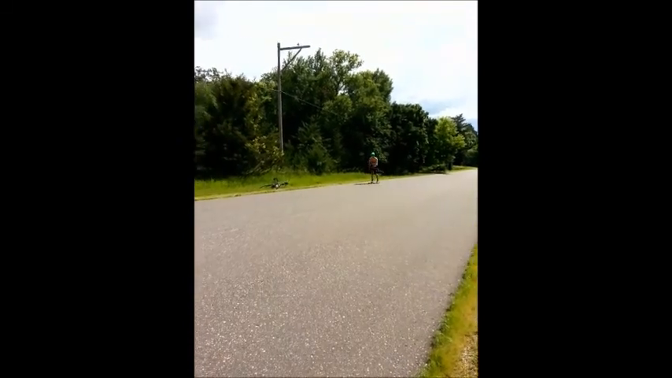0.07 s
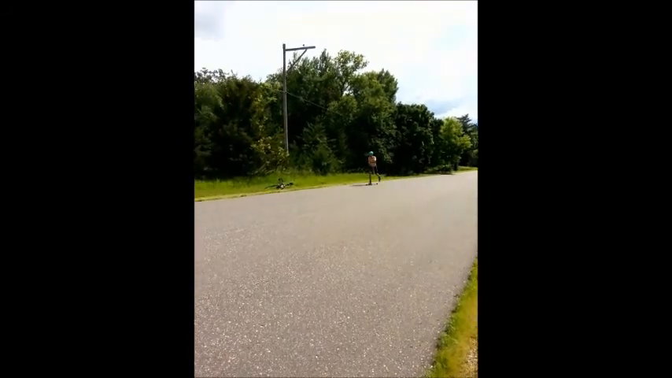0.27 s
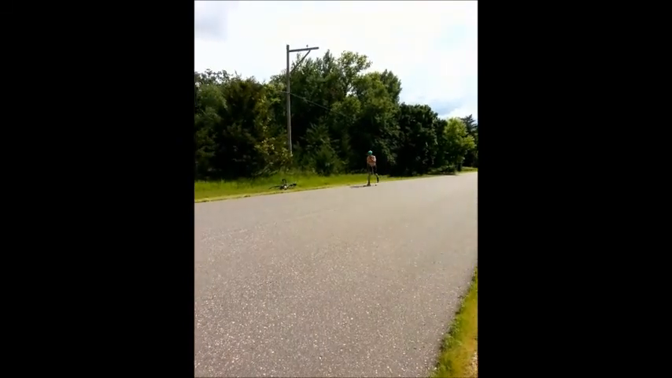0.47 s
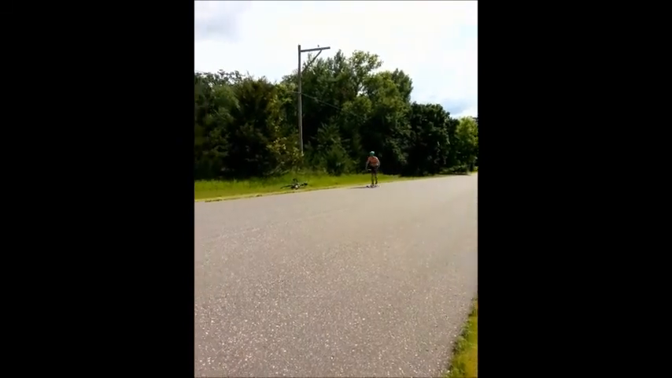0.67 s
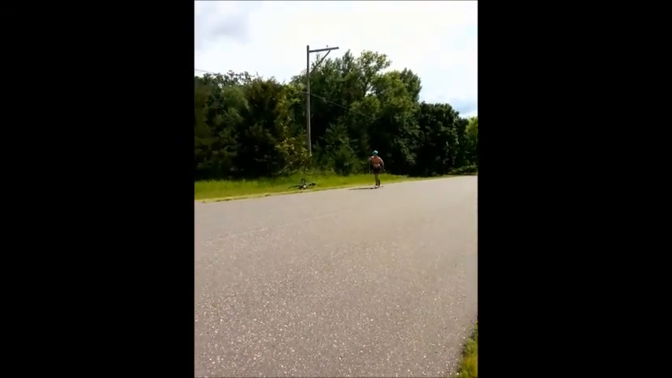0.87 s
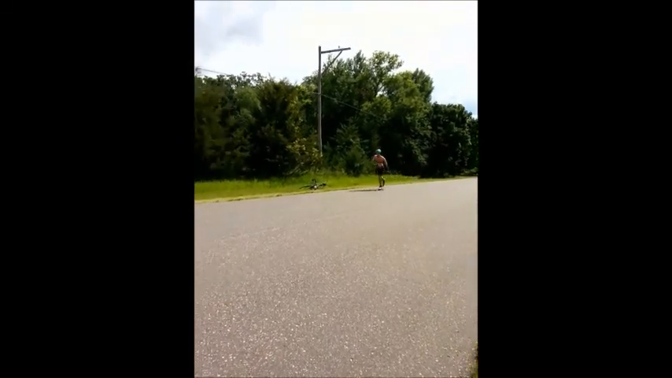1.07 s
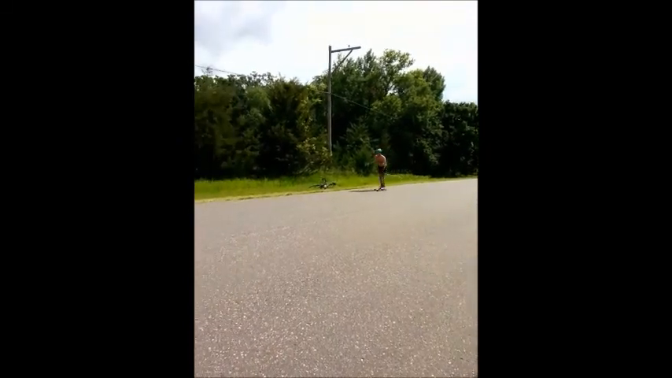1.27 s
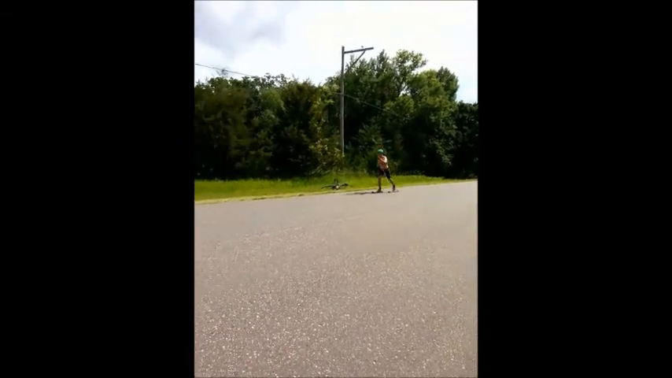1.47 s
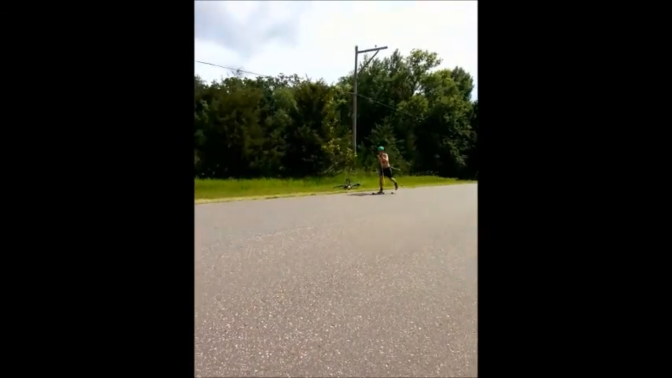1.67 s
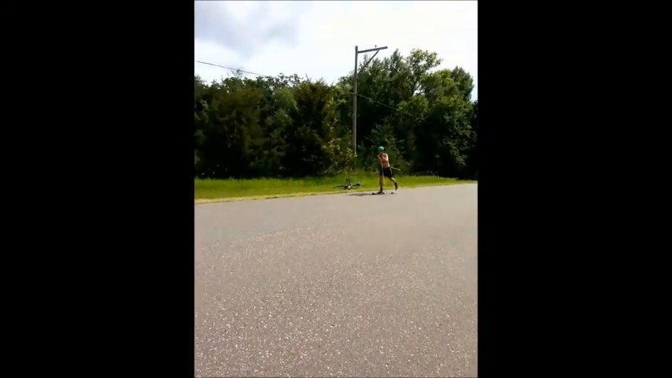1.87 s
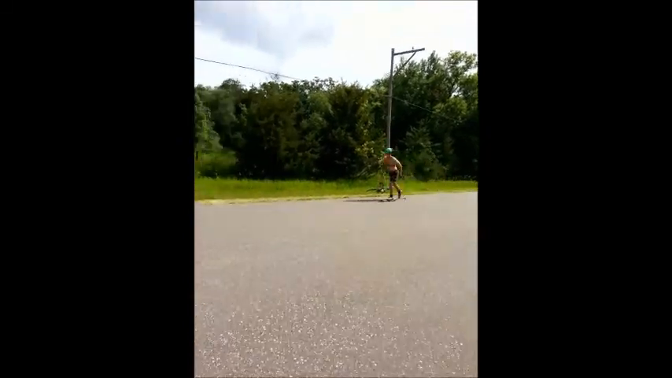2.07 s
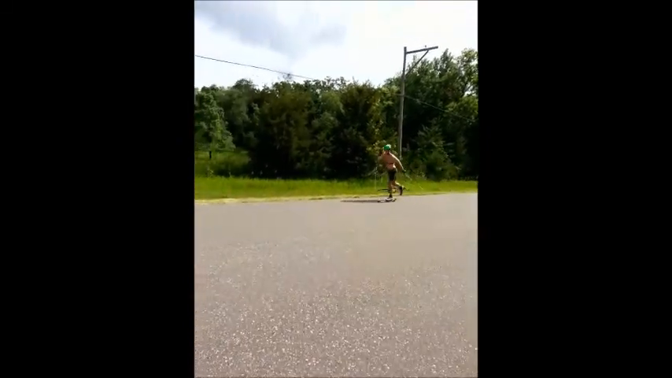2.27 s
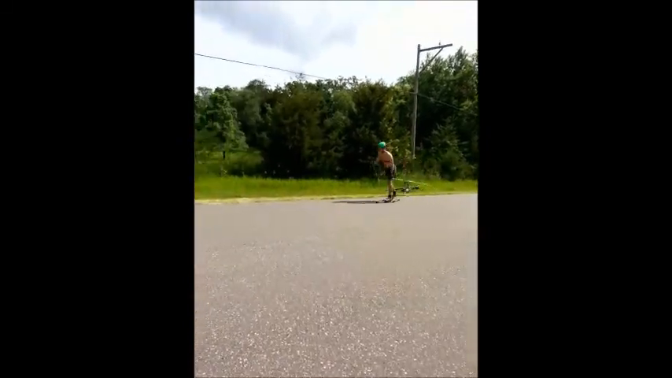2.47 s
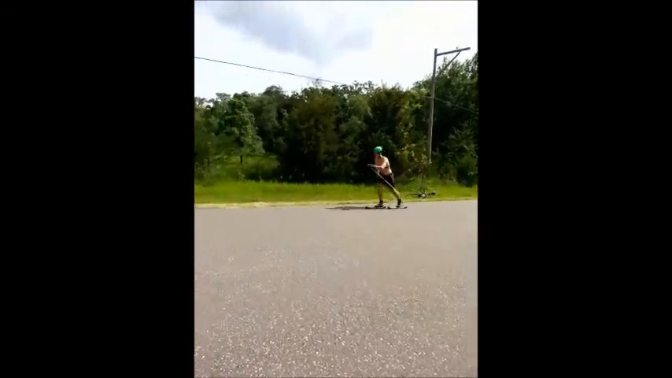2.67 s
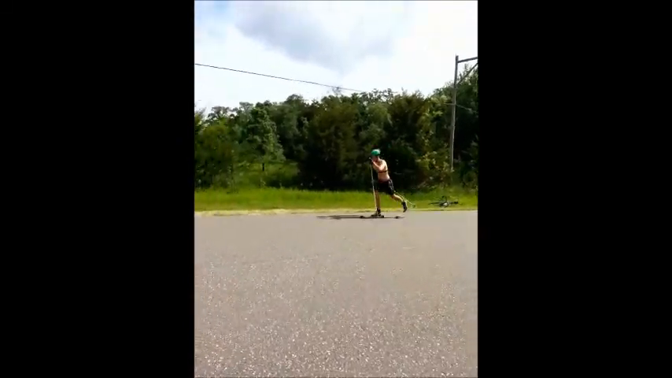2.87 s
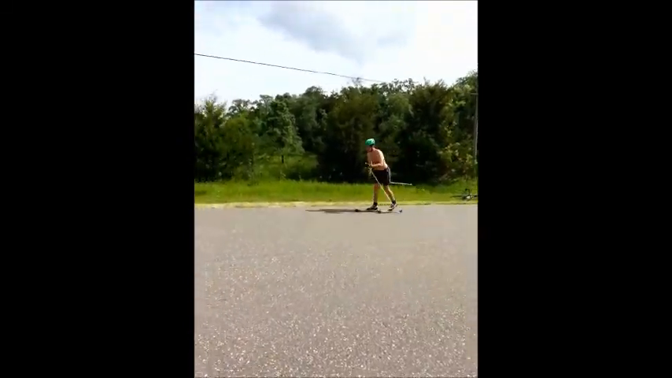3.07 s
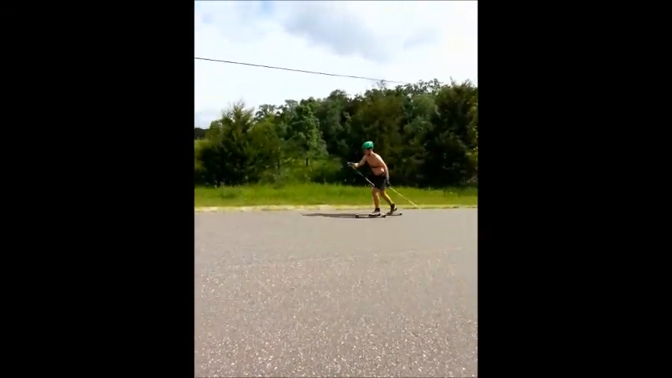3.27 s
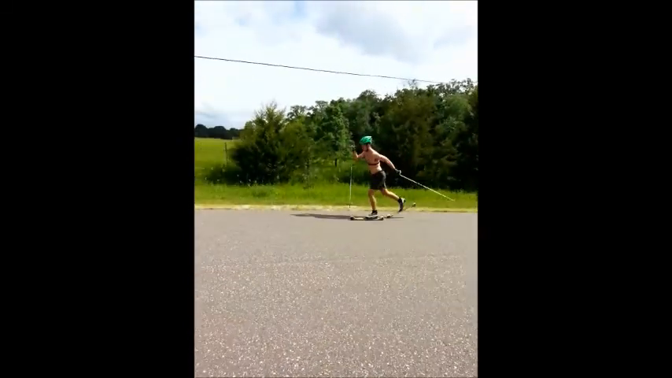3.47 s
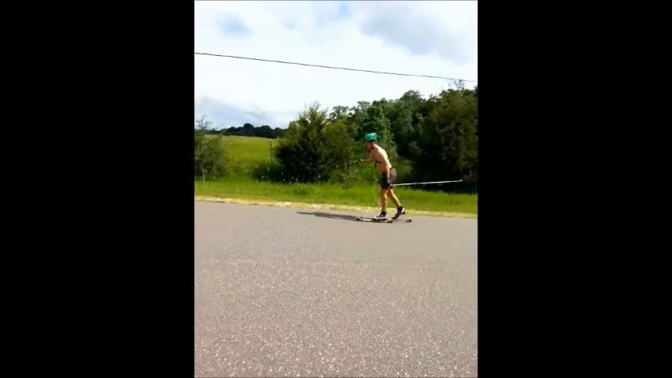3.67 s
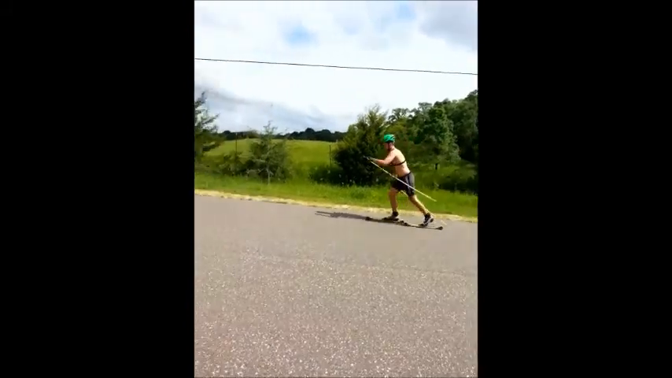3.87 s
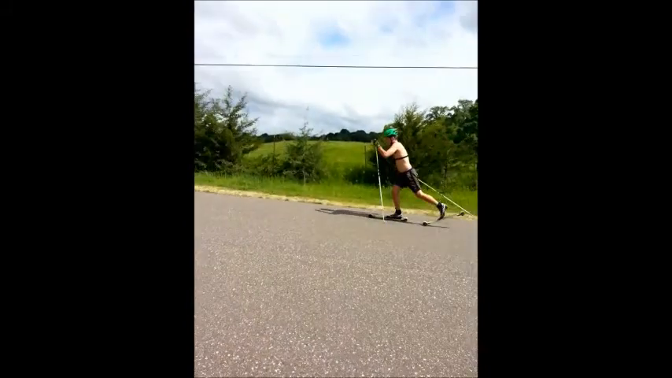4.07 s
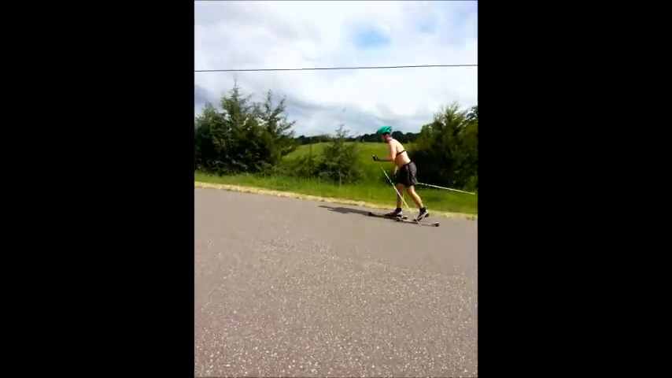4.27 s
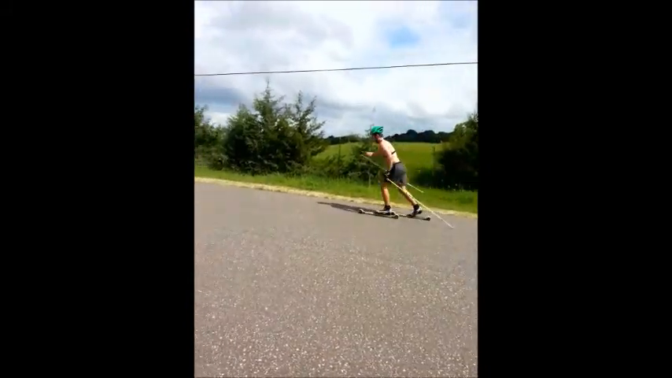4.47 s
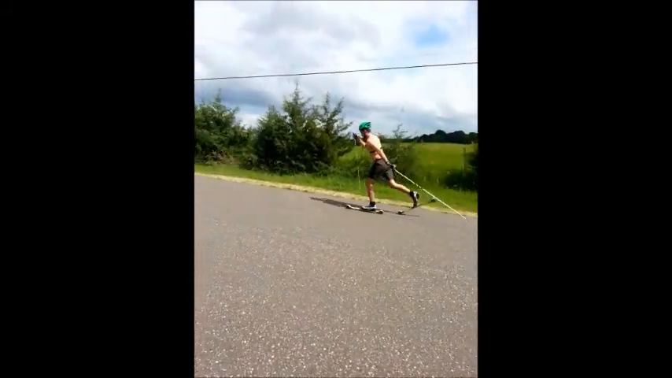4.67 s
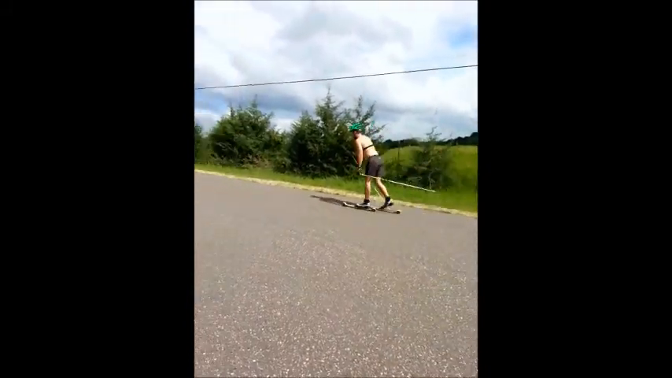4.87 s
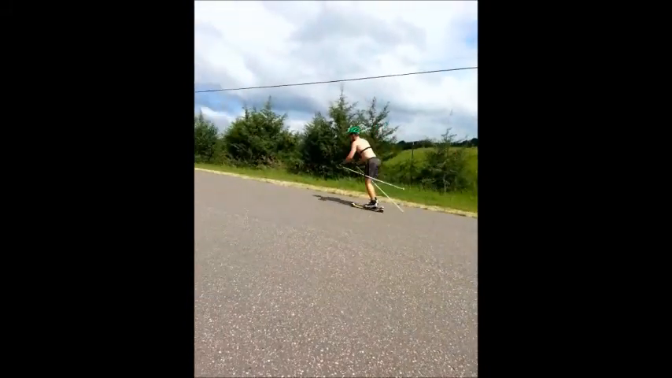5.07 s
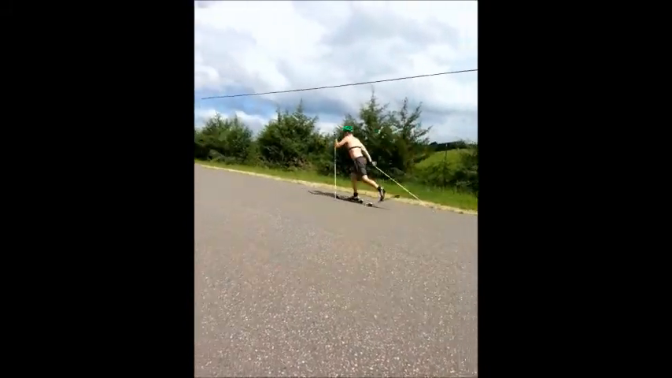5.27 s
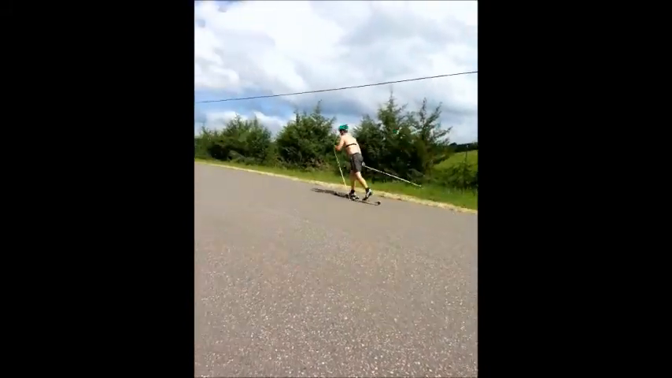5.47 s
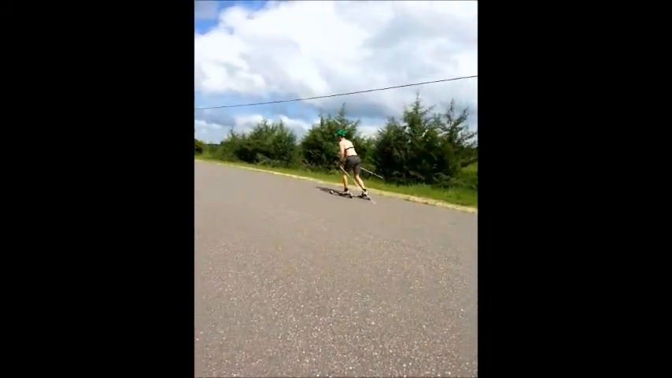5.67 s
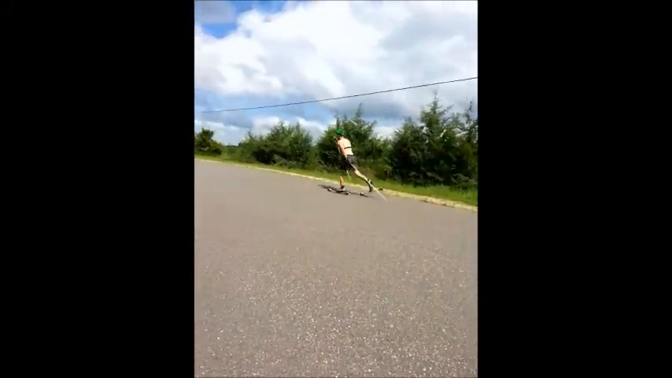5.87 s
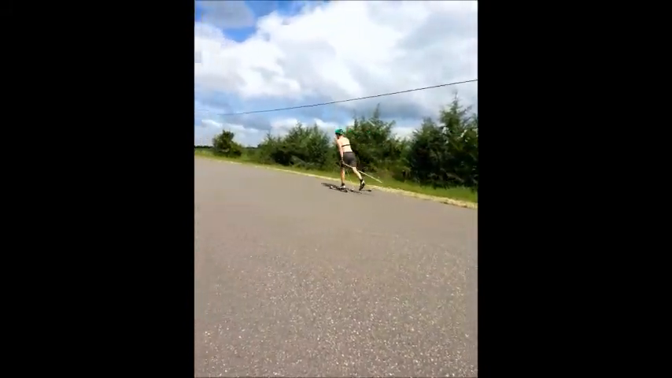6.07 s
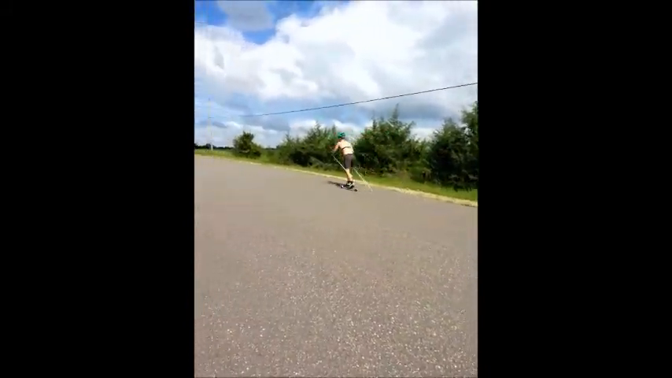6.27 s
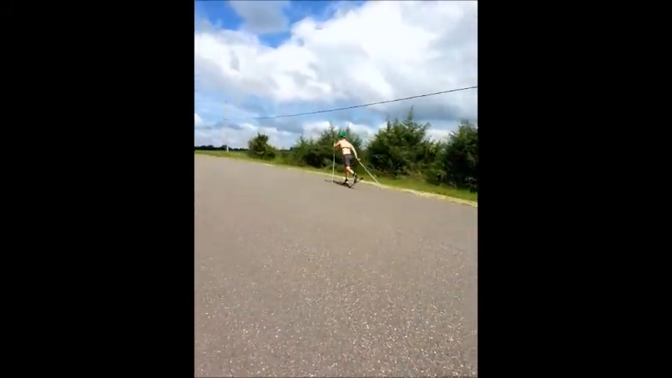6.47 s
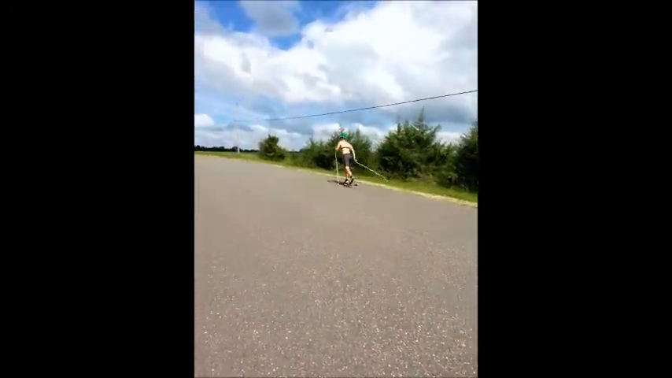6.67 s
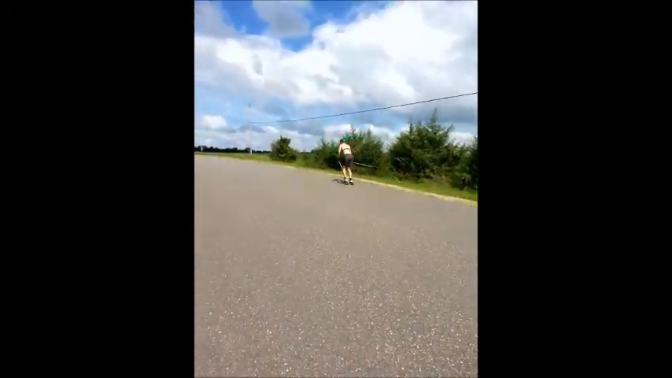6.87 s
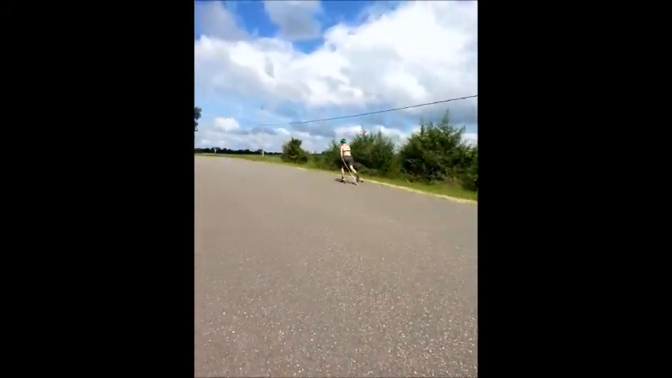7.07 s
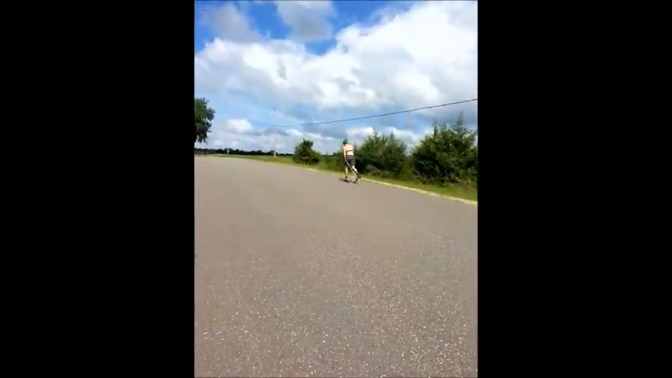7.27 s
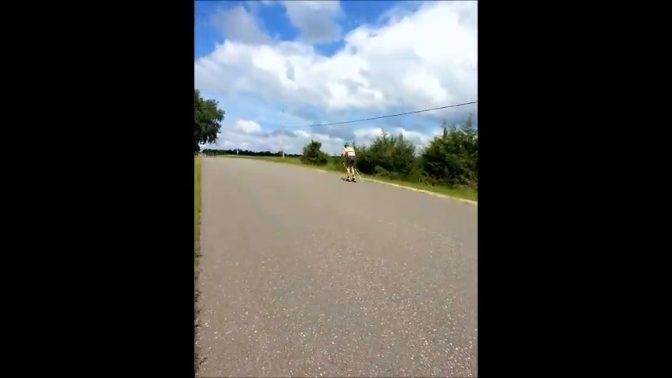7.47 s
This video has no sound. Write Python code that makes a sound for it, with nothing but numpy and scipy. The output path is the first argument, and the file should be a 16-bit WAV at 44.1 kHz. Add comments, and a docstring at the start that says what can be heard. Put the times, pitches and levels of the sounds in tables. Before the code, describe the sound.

Hard pole clicks and rattling ski landings swell and recede along a road, over buffeting wind puffs and a thin, high insect buzz.

```python
"""Asphalt road with insects in the verge: a roller skier passes one microphone, in gusty wind.
Pole tips and ski frames knock and bounce: short rattles and decaying modes, coloured by the body and bright tip.
A dragged tip and rolling wheels are lumpy coloured noise; ratchet ticks are brief noise bursts.
Insects are trains of falling chirps over a noise chorus; wind is lumpy low noise with single slowing puffs.
Far-field air and microphone hiss lie underneath."""
import sys
import numpy as np
from scipy import signal
from scipy.fft import rfft, irfft, next_fast_len
from scipy.io import wavfile
from scipy.ndimage import uniform_filter1d, map_coordinates

SR = 44100
rng = np.random.default_rng(int(sys.argv[2]) if len(sys.argv) > 2 else 0)


def wav_out(sig):
    """Save sig, one row per channel (or a flat mono array), as 16-bit PCM at SR to the path in sys.argv[1]."""
    wavfile.write(sys.argv[1], SR, np.round(np.clip(np.atleast_2d(sig).T, -1, 1) * 32767).astype(np.int16))


N = 331632  # samples

# Event levels are relative: the source functions add their own trims.
# Single knocks: a pole plant every 0.6 s, looser taps between, and single catches of a dragged tip:
# peak_s, level_db, ring_hz, clack_db and fizz_db (both relative to level_db)
KNOCKS = [(.301, -27.5, 3090, -6.5, -25), (.3686, -33, 1700, -3, -19), (.9103, -14.5, 2720, -2.5, -18),
          (1.1688, -30, 1630, -20, -33), (1.1804, -18.5, 1130, -19, -35), (1.2025, -25, 2820, -5, -25),
          (1.225, -17, 2920, -9, -40), (1.251, -25.5, 3440, 4.5, -36), (1.262, -21, 3650, -3, -20),
          (1.2986, -22.5, 2380, -2.5, -29), (1.5017, -29.5, 1250, -3, -14), (2.1354, -21.5, 2940, 0.5, -16),
          (2.4184, -33, 2460, -21, -22), (2.4446, -30, 3040, -14, -25), (2.736, -19, 3020, -2.5, -14),
          (3.038, -21, 2940, 4, -23), (3.0444, -19, 2550, 8.5, -26), (3.3552, -8, 2760, 4.5, -12.5),
          (3.3981, -35, 3500, -9, -12), (3.9423, -9, 2560, -9.5, -20), (4.0405, -33, 1570, -10, -27),
          (4.2874, -26.5, 2200, -20, -30), (4.5598, -14.5, 2790, -10.5, -23), (4.741, -38, 1560, -14, -27),
          (4.8414, -21.5, 3040, -8, -17), (5.1607, -8.5, 2700, -7.5, -22), (5.3838, -29, 2530, -17, -22),
          (5.535, -31, 1520, -13, -23), (5.7962, -15.5, 1167, -4.5, -22), (5.821, -33, 3000, 2, -11),
          (5.937, -33, 1450, -11, -12), (6.403, -24.5, 2830, -1.5, -8), (6.425, -26.5, 1800, -9, -24),
          (7.031, -26, 2540, -6, -31), (7.3614, -35, 2210, -7, -26)]
# A ski lands and chatters: peak_s, level_db, ring_hz, clack_db, fizz_db,
# touch_db and bounce_db (first touch and first bounce, relative to level_db), loss_db (per bounce)
LANDINGS = [(.2324, -27.5, 1134, -8.5, -22, -0.5, -23, 9), (0.4798, -22, 1690, -5.5, -16, -14, -9.5, 1),
            (0.856, -30.5, 2300, -4, -11, -2, -25, 9), (1.105, -22, 2580, -10.5, -19, -11, -10, 2.5),
            (1.472, -19, 2770, -17, -19.5, -7, -20.5, 0), (1.7158, -17, 3200, -9.5, -16.5, -10.5, -3.5, 12),
            (2.086, -29, 2660, -3, -11, 0, -18, 9), (2.368, -19.5, 2650, -5, -15, -8, -6, 2.5),
            (2.6976, -13.5, 2630, -7.5, -17.5, -8.5, -16, 12),
            (2.9425, -12.5, 3080, -10.5, -19, -14, -10, 1), (3.285, -24, 2710, -1.5, -10, -6, -25, 9),
            (3.5558, -15.5, 2470, -6, -15, -15, -7.5, 5.5), (3.9075, -13, 2750, -7, -8.5, -2, -13, 2.5),
            (4.128, -12, 1150, -9.5, -9, -10, -4.5, 29), (4.1826, -16.5, 2870, -11, -16, 0.5, -9, 20),
            (4.4951, -22, 3000, -6, -11.5, -0.3, -10.5, 4), (4.7813, -19, 2010, -11, -17, -3, -0.5, 5.5),
            (5.1202, -13, 3060, -5, -13, -3, -9.5, 10), (5.3388, -8, 3150, -12, -19.5, -10.5, -5.5, 21),
            (5.7338, -27, 3260, 2, -11, 1.5, -13, 5), (5.9902, -23, 1840, -1.5, -19, 3.5, -6.5, 0),
            (6.0459, -28.5, 2730, -9, -26, -1.5, -7, 3), (6.3362, -19.5, 1980, -1, -17, -3, -12, 4),
            (6.5943, -10.5, 2880, -2, -19, -12, -0.5, 6), (6.6417, -18.5, 2340, -6, -21, -29, -2.5, 5.5),
            (6.767, -32, 3160, -25, -20, -4.5, -7, 6), (6.978, -25.5, 1930, -4, -9, -0.5, -8, 8),
            (7.2902, -22.5, 2310, -3.5, -15.5, -3, -15.5, 0.5)]
# A dragged tip catches on stone after stone: first_s, last_s, gap_s, level_db, clack_db, fizz_db
CATCHES = [(3.0675, 3.142, .0114, -17.5, -0.8, -16)]
# Modes of frame and pole: pitch_hz, level_db
MODES = [(1170, -5.5), (1600, -3.5), (1970, -10), (2290, -3.5), (2680, -8), (3060, -7), (3560, -10),
         (4390, -11.5), (5650, -33)]
# A tip drags, one list per drag: time_s, level_db, treble_share (0-1)
DRAGS = [
    [(1.13, -50, 0.3), (1.17, -28, 0.26), (1.22, -35, 0.46), (1.27, -34, 0.3), (1.31, -38, 0.8),
     (1.36, -42.5, 0.5)],
    [(3.015, -40, 1), (3.035, -33, 0.94), (3.07, -24, 0.86), (3.11, -21.5, 1), (3.14, -29, 0.9),
     (3.16, -64, 0.7)],
]
# Ratchet ticks: start_s, level_db
TICKS = [(0.0665, -35), (0.147, -37), (0.192, -38), (1.372, -37), (2.557, -33), (2.597, -24.5),
         (2.611, -27), (2.645, -42), (2.827, -28), (2.849, -21.5), (2.8764, -22), (2.9138, -20),
         (3.7803, -41), (3.8112, -41), (3.825, -23.5), (3.8485, -22), (3.871, -27), (3.9207, -28),
         (3.976, -22), (4.0062, -22), (4.025, -22.5), (4.0414, -35), (4.0786, -32), (4.092, -29),
         (5.005, -33), (5.0444, -27), (5.0723, -27), (5.0934, -24), (5.1538, -20), (5.196, -21.5),
         (5.258, -28), (5.2814, -25), (5.3104, -31), (5.415, -29), (6.2352, -39), (6.26, -30),
         (6.2761, -40), (6.2863, -30), (7.318, -29), (7.3587, -45)]
# Rolling wheels: time_s, grit_db, hum_db
ROLL = [(0, -52, -54), (1.25, -49, -56), (2.07, -51, -52.5), (3.14, -41.5, -49), (3.4, -44.5, -48.5),
        (4.17, -45, -49.5), (4.59, -49.5, -49), (4.9, -44.5, -49.5), (5.6, -48.5, -54.5), (6.62, -51, -53),
        (7.52, -54.5, -57)]
# Insects: time_s, level_db, highest_singer_db (in the mix)
TRILL = [(0, -46, -16), (1.3, -45.5, -10), (2.79, -46.5, -8), (2.95, -53, -14), (3.4, -48.5, -9),
         (4.36, -51.5, -8.5), (5.05, -46.5, -10), (7.52, -49.5, -16)]
# Gusts on the microphone: start_s, end_s, start_level_db, end_level_db, edge_db (above the buffet)
GUSTS = [(0, 0.123, -30, -23, -13), (0.263, 0.376, -43, -34, -17), (0.403, 0.656, -21.5, -25.5, -6),
         (0.747, 1.126, -19.5, -28.5, -4), (1.23, 1.276, -28, -23, 6), (1.33, 1.5, -46, -42, -19),
         (1.518, 1.59, -42, -18, -12), (1.638, 1.674, -19.5, -17.5, -3), (1.934, 2.148, -35, -34, -29),
         (2.137, 2.195, -30.5, -27, -1), (2.243, 2.557, -31.5, -29, -15), (2.576, 2.843, -29.5, -44, -21),
         (3.12, 3.14, -42, -42.5, -22), (3.254, 3.636, -51, -38.5, -18), (3.873, 3.965, -42, -27.5, -4),
         (4.299, 4.373, -41.5, -39.5, -9), (4.505, 4.657, -27, -27.5, 2.5), (5.077, 5.3, -39, -39, 1),
         (5.33, 5.42, -24.5, -27.5, 6), (5.549, 5.708, -37, -29, -5), (5.756, 6.032, -28, -32.5, -4.5),
         (6.288, 6.521, -39, -22.5, -4.5), (6.619, 6.677, -24.5, -31, -14), (6.733, 7.3, -45.5, -54.5, 1.5)]
# The strongest single puffs on the microphone: time_s, level_db, pitch_hz
PUFFS = [(.423, -17.5, 191), (.486, -18.5, 210), (.611, -14, 137), (.749, -7.5, 185), (.856, -12.5, 164),
         (1.024, -14.5, 211), (1.07, -12.5, 186), (1.226, -9.5, 177), (1.266, -12, 258),
         (1.581, -14.5, 216), (1.673, -12, 151), (2.2, -11.5, 206), (2.216, -10, 191), (4.513, -15, 245),
         (4.582, -13, 182), (4.68, -11, 187), (5.35, -11.5, 262), (5.387, -4.5, 247), (5.409, -12, 190),
         (5.763, -14, 196), (6.429, -13.5, 315), (6.535, -11.5, 175)]

# Spectra, all with the columns pitch_hz, level_db (relative, per hertz)
# Pole and frame
BODY = [(260, -55), (450, -10.5), (647, -1), (884, -8), (1150, -3), (1790, -4.5), (2260, 1), (2650, -4),
        (3550, -6), (3930, -20), (4340, -13), (4750, -30), (5000, -6), (6500, -39), (11000, -120)]
# Hard clack of a contact
CLACK = [(1500, -65), (2650, -3), (4500, -8.5), (4960, -6), (5670, 0.5), (6230, -3.5), (9500, -19),
         (12400, -68), (20900, -120)]
# Bright fizz of the tip
FIZZ = [(5500, -65), (8000, -14), (9300, -3), (10300, -3), (11400, -3), (12600, -1), (13800, -7),
        (15300, -3), (17500, -25), (21000, -65)]
# Treble scrape of the dragged tip
SCRAPE = [(290, -53), (500, -49), (941, -29), (1130, 3), (1350, -23), (1490, -24), (1720, 0), (4640, -3),
          (5670, 5), (6450, -10), (15500, -30.5)]
# Ratchet pawl
PAWL = [(800, -65), (1500, -36), (3000, 6), (4500, -15), (5600, 9.5), (7400, 5), (9500, -13), (12000, -17),
        (16000, -40)]
# Wheels on grit
GRIT = [(600, -48), (900, -19), (1200, 0), (1400, -3.5), (2000, 0), (2400, 1), (3100, -2.5), (3800, -6.5),
        (4500, -10), (5600, -9.5), (6800, -13), (9000, -22.5), (12000, -25), (15800, -33)]
# Frame humming along with the wheels
HUM = [(120, -36), (200, -8), (422, -14), (650, -5), (886, -19.5), (1000, -13), (1300, -22), (2200, -120)]
# Far insects
CHORUS = [(4600, -22), (5100, -6.5), (5600, -3), (6000, -5.5), (6500, -40)]
# Soft part of a gust
BUFFET = [(12, -56), (20, -32), (36, -26), (56, 5), (118, 4), (206, -6), (330, -15.5), (430, -31),
          (730, -120)]
# Sharp part of a gust
EDGE = [(120, -28), (220, -5), (350, -6), (500, -12), (800, -27.5), (1200, -80)]
# Far field
AIR = [(24, -24), (40, 9.5), (464, -8.5), (612, -8.5), (873, -9.5), (1110, 0.5), (1350, -14), (2300, -15),
       (4500, -32), (5850, -57), (9900, -120)]
# Microphone hiss
HISS = [(3000, -5), (4500, 5), (6500, -14), (9000, -1.5), (12000, -1), (15800, 1)]

TOUCH_LEAD_S, BOUNCE_GAP_S, BOUNCE_JITTER_S, BOUNCE_SPREAD_DB = .0097, .0099, .00074, 1.5
TOUCH_CLACK_DB, BOUNCE_CLACK_DB = -9, -8
BOUNCE_FIZZ_DB = -3.5  # over the fizz of the landing
CATCH_SPREAD_DB = 2
THUD_DB_PER_OCTAVE = -4  # contacts that ring low drive the body harder
GUST_RISE_DB_PER_S, GUST_FALL_DB_PER_S = 1000, 279
CALM_DB, CALM_EDGE_DB = -54, 0
# Small puffs, their level over the buffet curve and their median pitch
EDDY_GAP_S, EDDY_DB, EDDY_SPREAD_DB, EDDY_HZ = .021, 5.5, 3.5, 175.5
TOP_HZ = 15850  # upper band limit


def knocks():
    """Each contact is a short rattle that drives the body, its modes and the bright tip."""
    t = np.arange(SR // 8) / SR
    drive, onset_s = np.zeros((4, N + SR)), .0015  # rows: body, clack, fizz, ring
    rise = t / np.array([[.0015], [.0013], [.0011], [.0017]])  # seconds to the peak
    blow = rise * np.exp(1 - rise)  # sudden start; clack and fizz die before body and ring
    mode_hz, mode_db = np.transpose(MODES)[:, :, None]
    for peak_s, level_db, ring_hz, clack_db, fizz_db in contacts():
        # dull contacts shake on more strongly
        shiver = amp(-21.0 - 0.63 * clack_db - 60 * t / 0.24) * (t > onset_s)
        rattle = rng.standard_normal((4, len(t)))
        strength, phase = rng.standard_normal((2, len(MODES), 1))
        grit_steps = np.repeat(rng.standard_normal(len(t) // 20 + 1), 20)[:len(t)]
        rattle[:3] *= amp(2.0 * grit_steps)  # grit breaks in bits
        near = amp(-7 * abs(np.log2(mode_hz / ring_hz)))  # modes close to the main ring are driven hardest
        mode_gain = near * amp(mode_db + 3.56 * strength)
        other_modes = mode_gain * np.sin(2 * np.pi * (mode_hz * t + phase))
        main_ring = np.sin(2 * np.pi * ring_hz * t + np.cumsum(0.032 * rattle[3]))
        rattle[3] = main_ring + other_modes.sum(axis=0)
        body_db = -9.5 + THUD_DB_PER_OCTAVE * np.log2(ring_hz / 2000)
        gains = amp(level_db + np.array([[body_db], [clack_db - 2.5], [fizz_db - 4.0], [-5]]))
        shape = blow + shiver * np.array([[1.5], [.6], [.6], [0]])
        first = round((peak_s - onset_s) * SR)
        drive[:, first:][:, :len(t)] += gains * shape * rattle
    return colour(drive[0], BODY) + colour(drive[1], CLACK) + colour(drive[2], FIZZ) + drive[3, :N]


def contacts():
    """Rows like the knocks for every touch, landing, bounce and catch."""
    rows = list(KNOCKS)
    for peak_s, level_db, ring_hz, clack_db, fizz_db, touch_db, bounce_db, loss_db in LANDINGS:
        rows.append((peak_s - TOUCH_LEAD_S, level_db + touch_db, any_ring(order=1), TOUCH_CLACK_DB, fizz_db))
        rows.append((peak_s, level_db, ring_hz, clack_db, fizz_db))
        for k in range(5):
            late, uneven = rng.standard_normal(2)
            # timing grows looser from bounce to bounce
            bounce_s = peak_s + (k + 1) * BOUNCE_GAP_S + np.sqrt(k) * BOUNCE_JITTER_S * late
            db = level_db + bounce_db - k * loss_db + BOUNCE_SPREAD_DB * uneven
            rows.append((bounce_s, db, any_ring(order=2), BOUNCE_CLACK_DB, fizz_db + BOUNCE_FIZZ_DB))
    for first_s, last_s, gap_s, level_db, clack_db, fizz_db in CATCHES:
        for s in np.arange(first_s, last_s, gap_s):
            late, uneven = rng.standard_normal(2)
            db = level_db + CATCH_SPREAD_DB * uneven
            rows.append((s + BOUNCE_JITTER_S * late, db, any_ring(order=2), clack_db, fizz_db))
    return rows


def any_ring(order):
    """Pitch in Hz of a chance mode, from index order up to index 5."""
    return MODES[rng.integers(order, 6)][0]


def drag():
    """A tip stutters over the stones, dull in the shaft and bright at the point."""
    out, t = np.zeros(N), np.arange(N) / SR
    for rows in DRAGS:
        level_db, treble = curves(rows)
        treble = treble.clip(0, 1)
        sounding = (t > rows[0][0]) & (t < rows[-1][0])
        point = treble * noise(SCRAPE, 3.2, 300)
        shaft = (1 - treble) * noise(BODY, 7.4, 200)
        out += sounding * amp(level_db) * (point + shaft)
    return out


def ratchet():
    """The pawl drops on a tooth and buzzes for a few milliseconds."""
    drive, t = np.zeros(N + SR), np.arange(SR // 40) / SR
    for start_s, level_db in TICKS:
        decay = amp(level_db - 3.5 - 60 * t / 0.013)  # 60 dB in 13 ms
        drive[round(start_s * SR):][:len(t)] += decay * rng.standard_normal(len(t))
    return colour(drive, PAWL)


def wheels():
    """Rubber rolls over coarse grit; the frame hums along."""
    grit_db, hum_db = curves(ROLL)
    return amp(grit_db) * noise(GRIT, 1.35, 150) + amp(hum_db) * noise(HUM, 1.3, 25)


def insects():
    """Three near singers in the verge over a far chorus of noise."""
    level_db, high_db = curves(TRILL)
    near = amp(high_db) * singer(31, 6350, 1300)
    near = near + amp(-8) * singer(34, 5850, 900) + amp(-13.5) * singer(38, 5500, 700)
    return amp(level_db) * (near + amp(-5.5) * noise(CHORUS, 3.5, 45))


def singer(rate_hz, top_hz, fall_hz):
    """One insect: a nearly steady train of chirps, each falling ever faster in pitch."""
    stroke = np.cumsum(rate_hz * (1 + 0.07 * wobble(6.9))) / SR % 1  # position within the chirp, 0-1
    pitch_hz = top_hz - fall_hz * stroke ** 1.7 + 60 * wobble(30)
    swell = abs(np.sin(np.pi * stroke)) ** 4.3
    drift = amp(2.5 * wobble(2.64) + 3.4 * wobble(18))
    return unit(swell * drift * np.sin(2 * np.pi * np.cumsum(pitch_hz) / SR))


def wind():
    """Eddies push on the microphone in lumps; one drive feeds the soft and the sharp part."""
    buffet_db, edge_db = gusts()
    lumps = amp(5.1 * wobble(55))
    # level the lumps over 1/9 s: the gust curve sets the mean push
    lumps = lumps / np.sqrt(np.abs(uniform_filter1d(lumps ** 2, SR // 9)))
    push = lumps * rng.standard_normal(N)
    soft, sharp = unit(colour(push, BUFFET)), unit(colour(push, EDGE))
    return amp(buffet_db - 5.0) * (soft + amp(edge_db - 6.0) * sharp)


def gusts():
    """Buffet dB and edge dB per sample: gusts rise, drift and fall, adding in power over a calm."""
    t = np.arange(0, N / SR, 1 / 1000)  # a knot each millisecond
    soft, sharp = amp(2 * CALM_DB), amp(2 * (CALM_DB + CALM_EDGE_DB))  # doubled dB gives power
    for start_s, end_s, start_db, end_db, edge_db in GUSTS:
        db = np.interp(t, [start_s, end_s], [start_db, end_db])
        db = db - GUST_RISE_DB_PER_S * (start_s - t).clip(0) - GUST_FALL_DB_PER_S * (t - end_s).clip(0)
        soft, sharp = soft + amp(2 * db), sharp + amp(2 * (db + edge_db))
    return curves(np.transpose([t, 10 * np.log10(soft), 10 * np.log10(sharp / soft)]))


def puffs():
    """One eddy passing the port: a single swing, mostly suction, that slows down."""
    lead = SR // 50  # samples ahead of the peak
    out, t = np.zeros(N + SR), (np.arange(SR // 20) - lead) / SR
    for time_s, level_db, pitch_hz in eddies(gusts()[0]):
        cycles = pitch_hz * t
        swell = np.exp(-(cycles / np.where(t < 0, .55, .8)) ** 2)  # rises faster than it fades
        slowing = cycles - 0.34 * cycles ** 2 + .13 * rng.standard_normal()
        swing = swell * -np.cos(2 * np.pi * slowing)
        out[round(time_s * SR) - lead:][:len(t)] += amp(level_db - 3.0) * swing
    return out[:N]


def eddies(buffet_db):
    """The strong puffs and a chance stream of small ones that follows the gusts."""
    when_s = np.arange(.04, N / SR - .1, EDDY_GAP_S)
    late, uneven, pitch = rng.standard_normal((len(when_s), 3)).T
    when_s = when_s + 0.307 * EDDY_GAP_S * late.clip(-1, 1)
    level_db = buffet_db[(when_s * SR).astype(int)] + EDDY_DB + EDDY_SPREAD_DB * uneven
    return PUFFS + list(zip(when_s, level_db, EDDY_HZ * np.exp(.18 * pitch)))


def background():
    """Far-field air and microphone hiss: two gently wavering coloured noises."""
    return amp(-57) * noise(AIR, 0.49, 9.6) + amp(-63.5) * noise(HISS, 0.44, 12)


def amp(db):
    """Decibels to gain."""
    return 10 ** (np.asarray(db) / 20)


def unit(x):
    """x at rms 1."""
    return x / np.sqrt(np.mean(x ** 2) + 1e-20)


def curves(rows):
    """One value per sample for each column after the time."""
    s, *columns = np.transpose(rows)
    return [np.interp(np.arange(N) / SR, s, column) for column in columns]


def wobble(rate):
    """A smooth random curve, rate knots a second."""
    knots = rng.standard_normal(int(N * rate / SR) + 4)
    return map_coordinates(knots, [np.arange(N) * rate / SR])


def colour(x, spectrum):
    """x through a causal minimum-phase filter of power gain 1 with the spectrum's shape."""
    pitch_hz, level_db = np.transpose(spectrum)
    hz = np.fft.rfftfreq(4096, 1 / SR)
    shape_db = np.interp(np.log(hz + 1), np.log(pitch_hz + 1), level_db, left=-70, right=-70).clip(-70)
    cepstrum = irfft(np.log(amp(shape_db)))
    cepstrum[1:2048] *= 2  # fold the cepstrum onto positive time for minimum phase
    cepstrum[2049:] = 0
    pulse = irfft(np.exp(rfft(cepstrum)))
    return signal.fftconvolve(x, pulse / np.linalg.norm(pulse))[:N]


def noise(spectrum, lump_db, rate):
    """Coloured noise of rms 1 whose drive comes in lumps, rate knots a second."""
    return unit(colour(amp(lump_db * wobble(rate)) * rng.standard_normal(N), spectrum))


def scene():
    """Skier, verge, wind and background at one microphone."""
    skier = knocks() + drag() + ratchet() + wheels()
    return (skier + insects() + wind() + puffs() + background())[None]


def record(dry):
    """The microphone drops the deepest bass, clips at full scale and passes nothing above the band limit."""
    size = next_fast_len(N)
    hz = np.fft.rfftfreq(size, 1 / SR)
    bass_cut = hz ** 4 / (hz ** 4 + 40 ** 4)  # half amplitude at 40 Hz
    wet = irfft(rfft(dry, size) * bass_cut, size)
    return irfft(rfft(np.clip(wet, -1, 1)) * (hz < TOP_HZ), size)[:, :N]


dry = scene()
out = record(dry)
wav_out(out)
```